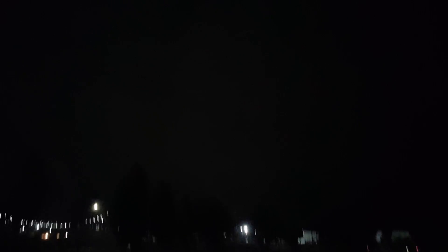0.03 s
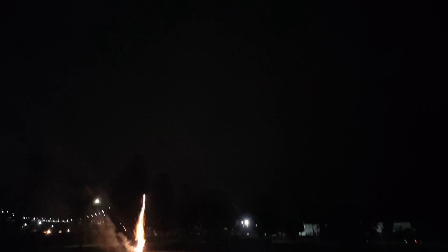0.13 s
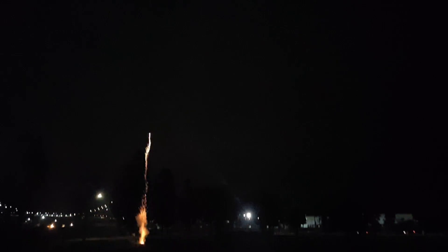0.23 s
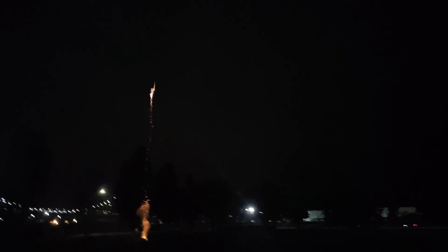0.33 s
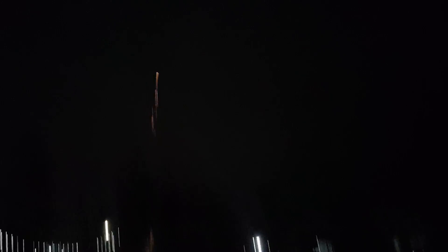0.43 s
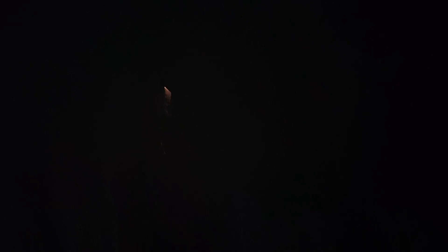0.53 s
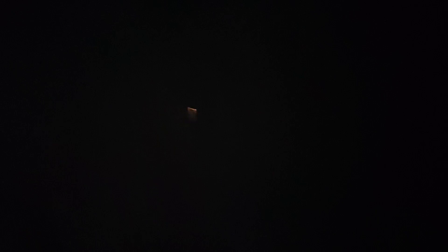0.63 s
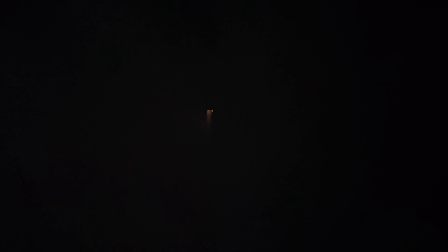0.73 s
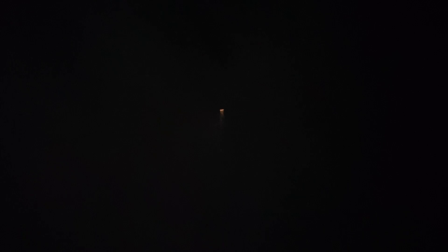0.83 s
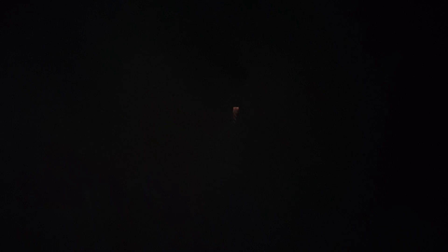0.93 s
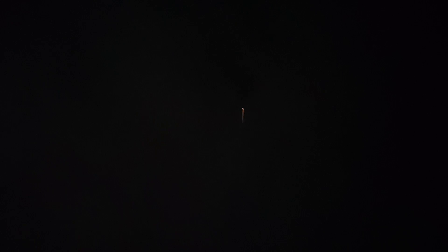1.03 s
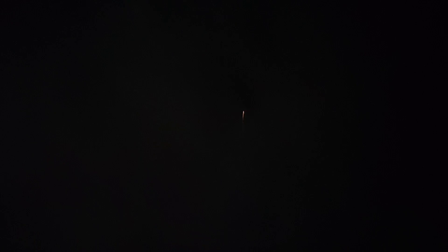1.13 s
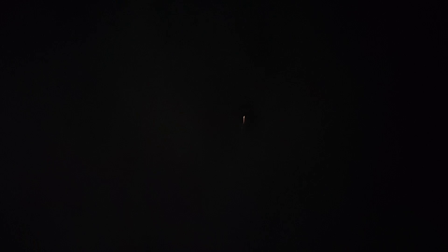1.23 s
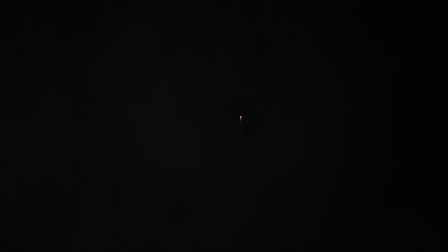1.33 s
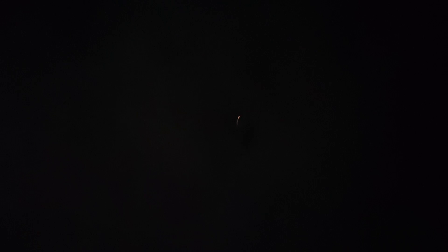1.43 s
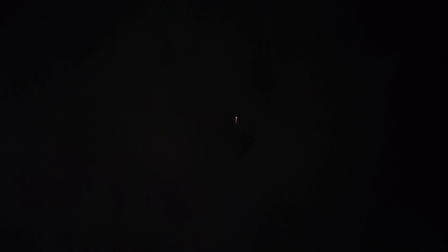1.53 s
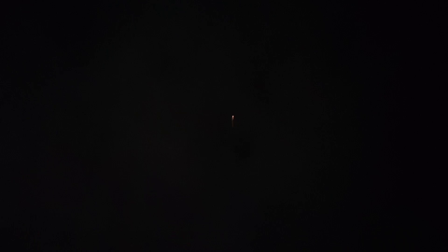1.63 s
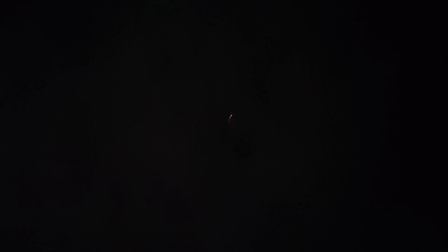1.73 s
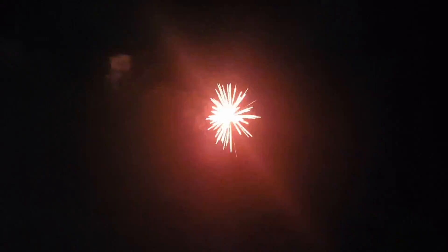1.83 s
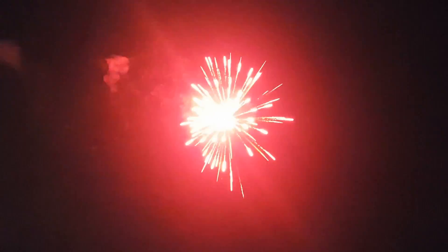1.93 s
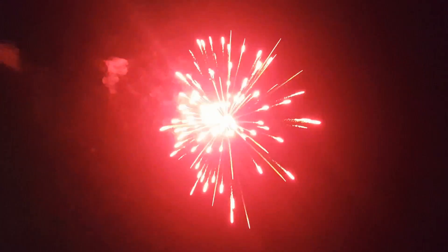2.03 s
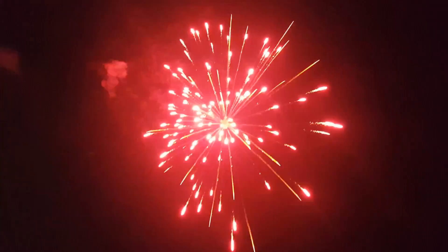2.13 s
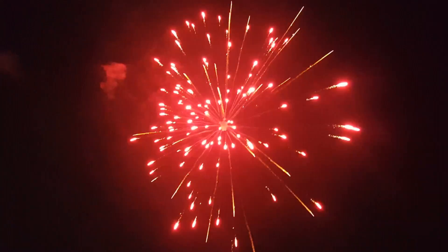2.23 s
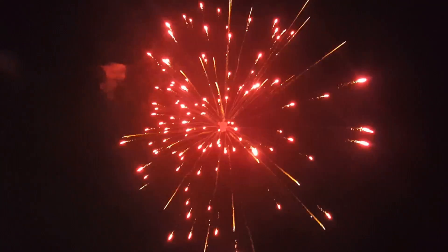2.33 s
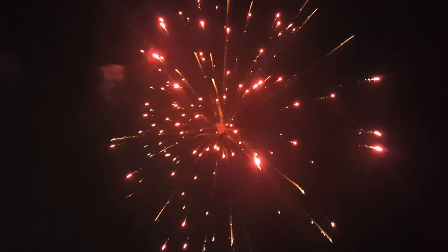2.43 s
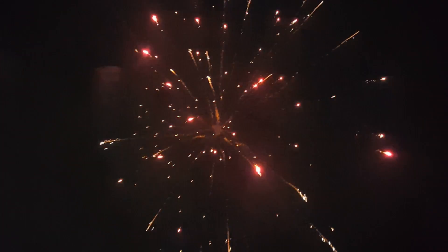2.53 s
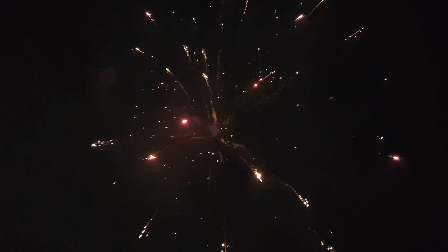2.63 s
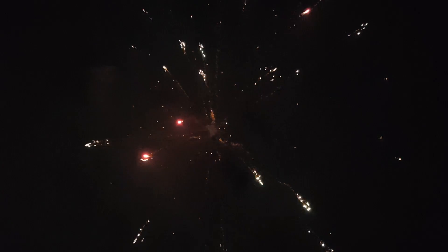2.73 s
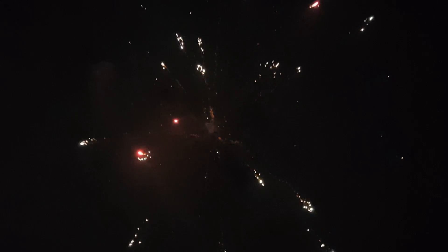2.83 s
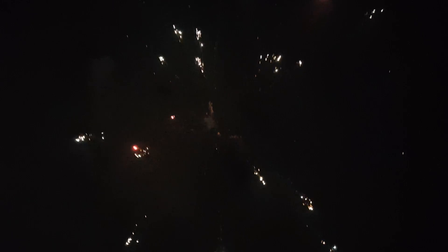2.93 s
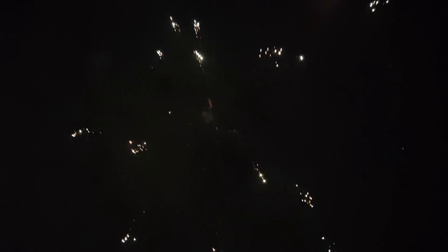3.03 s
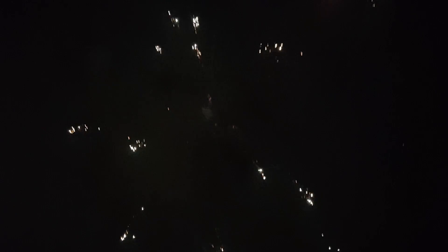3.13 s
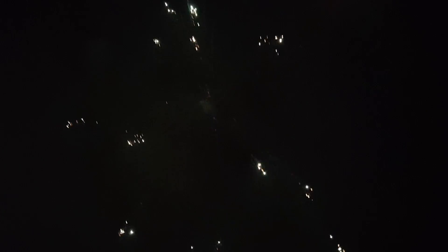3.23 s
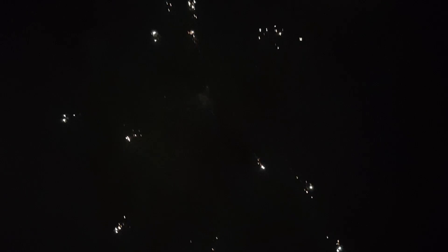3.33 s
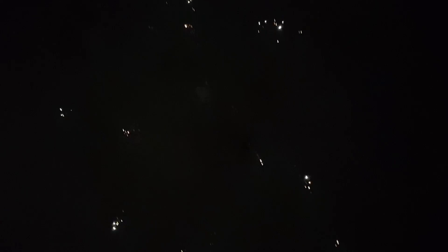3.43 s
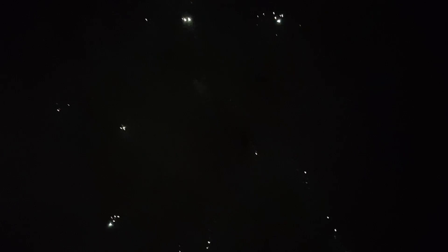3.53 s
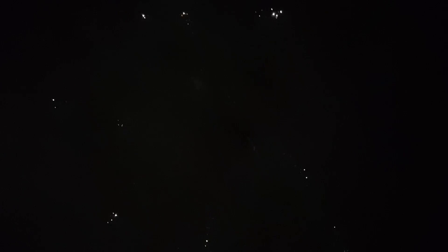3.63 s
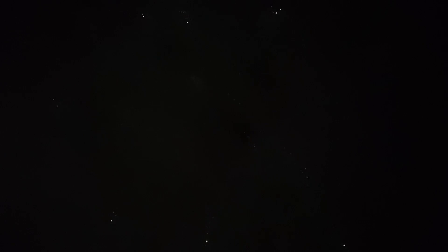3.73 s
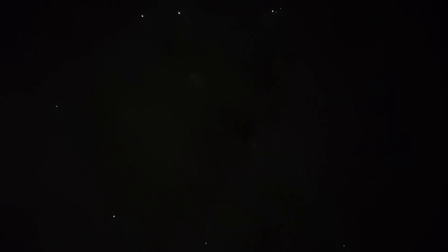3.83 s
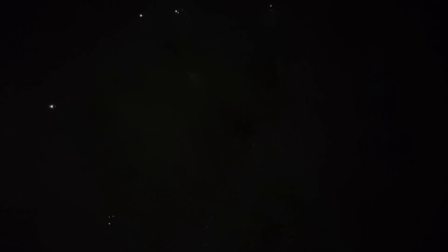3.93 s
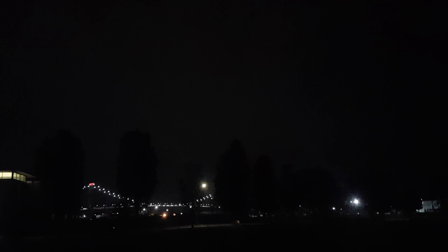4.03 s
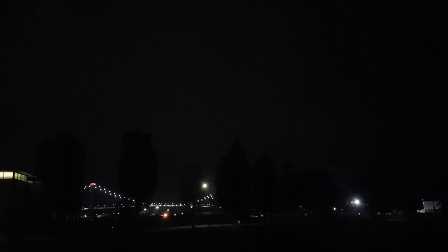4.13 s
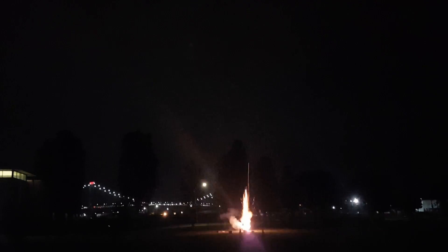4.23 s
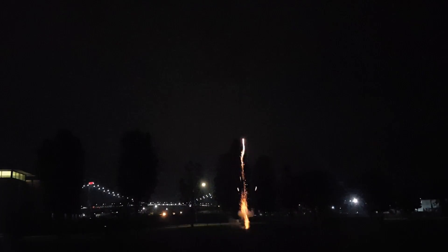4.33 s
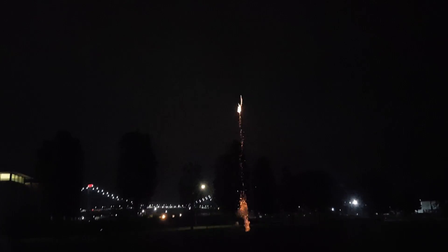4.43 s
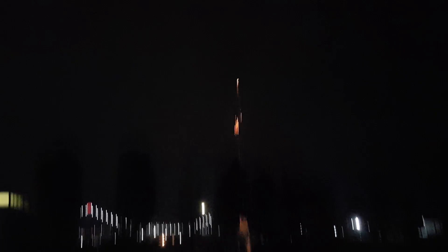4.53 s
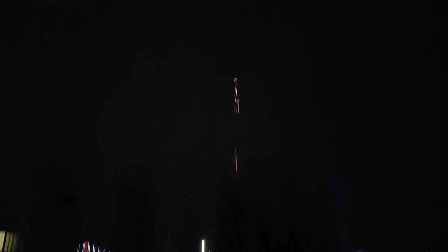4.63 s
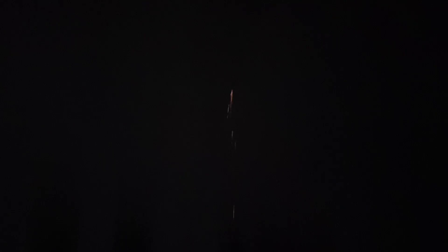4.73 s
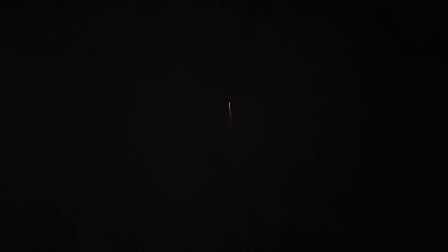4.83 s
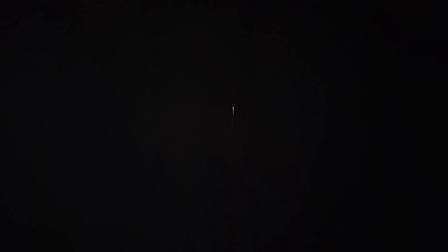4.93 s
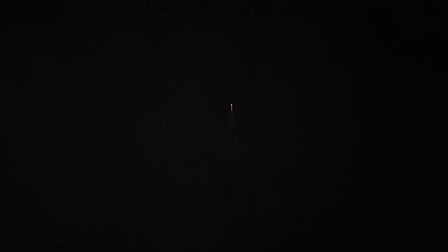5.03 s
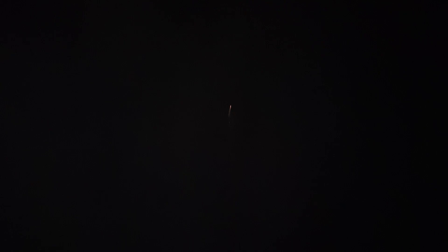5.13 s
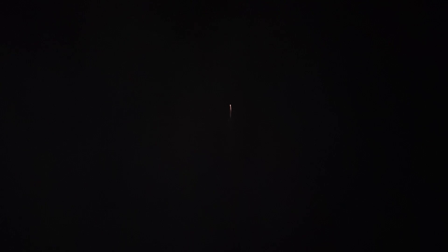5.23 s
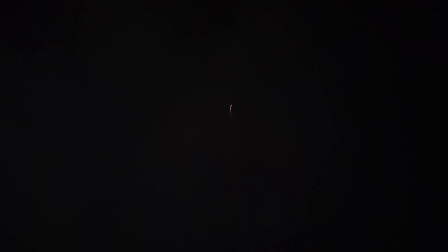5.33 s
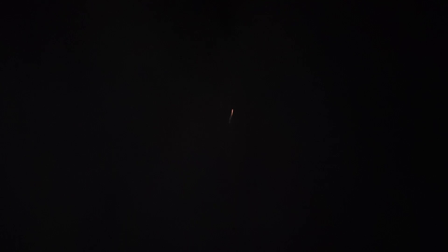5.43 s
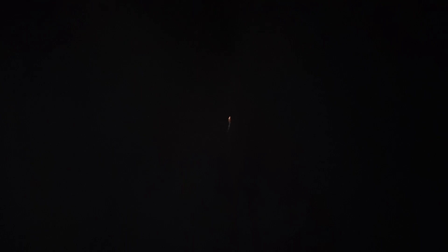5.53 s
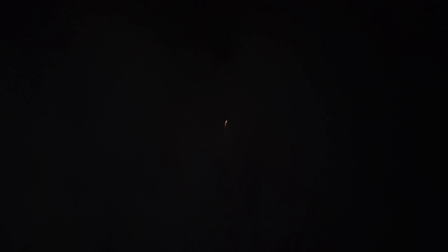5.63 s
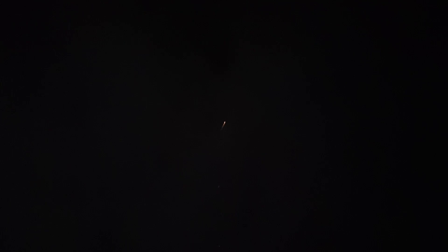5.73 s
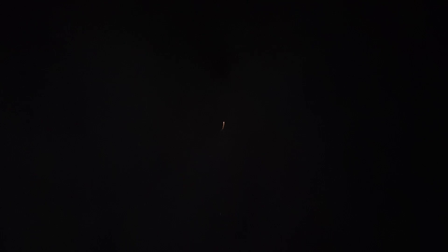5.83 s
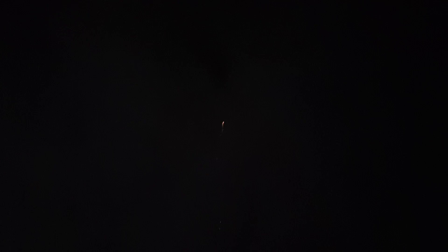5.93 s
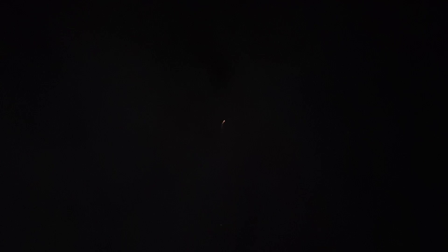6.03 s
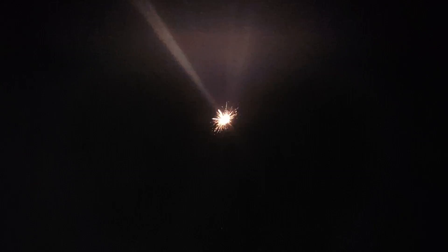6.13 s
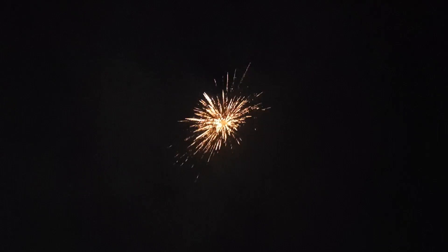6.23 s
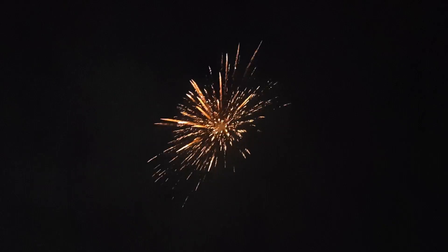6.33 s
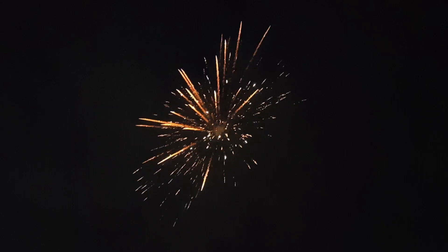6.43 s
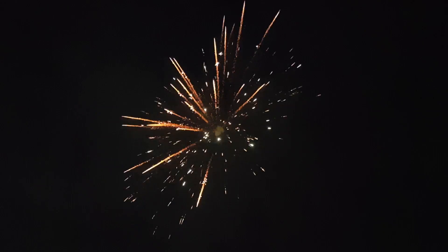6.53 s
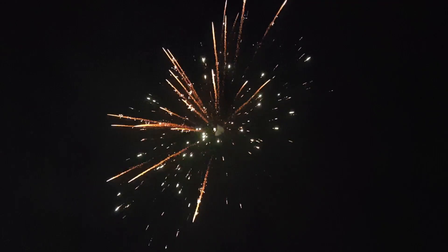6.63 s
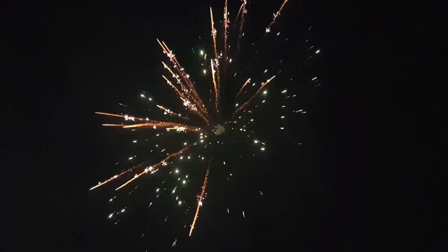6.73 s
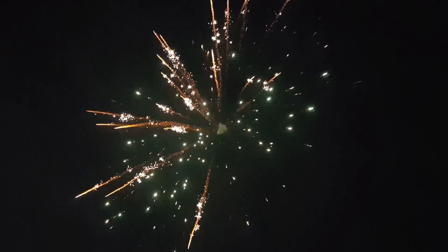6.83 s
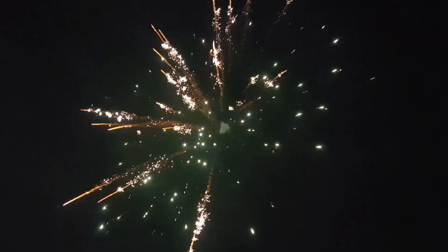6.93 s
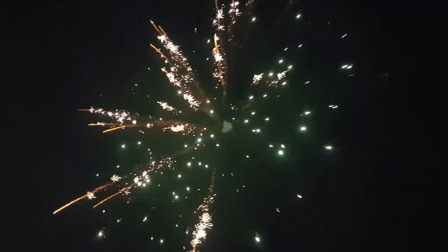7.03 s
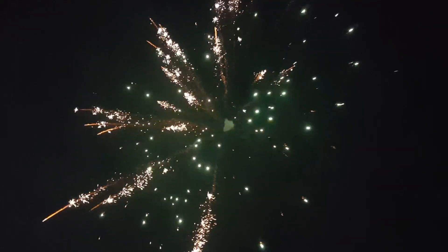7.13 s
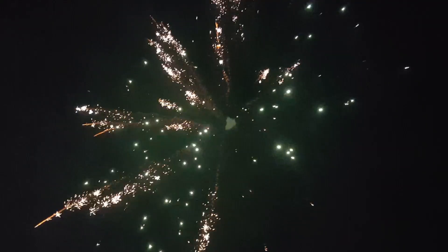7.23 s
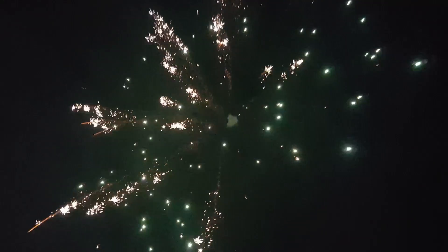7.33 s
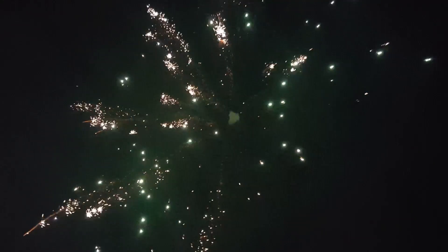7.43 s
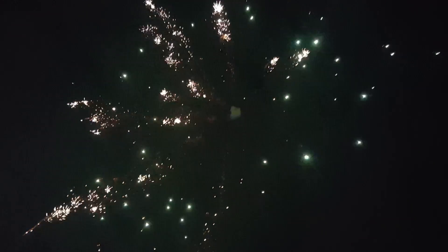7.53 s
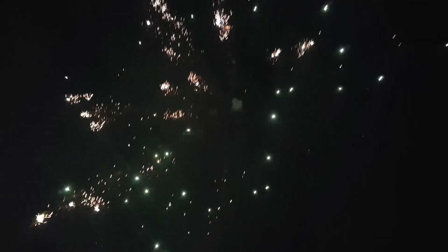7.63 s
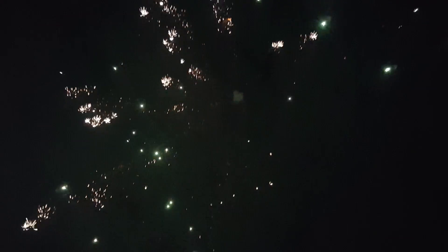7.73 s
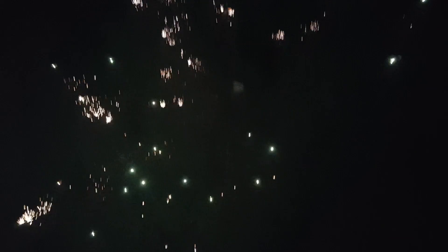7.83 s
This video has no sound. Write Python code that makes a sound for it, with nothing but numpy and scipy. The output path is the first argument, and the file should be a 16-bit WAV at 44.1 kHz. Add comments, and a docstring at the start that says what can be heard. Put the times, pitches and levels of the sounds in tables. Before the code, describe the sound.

At night, a mortar thud, then a cracking aerial boom with thunderlike roll; again a sharper launch, another boom, and fizzing, popping stars.

```python
"""Fireworks over a park at night

Two shells are fired from mortars with a gas jet, a thump and a ringing tube, and burst high overhead.
Decaying noise is the scatter off trees and near surfaces; delayed thumps and slaps are single echoes;
swelling noise is the far roll. The second shell's stars end in dense crackling: grainy noise and pops.
Blasts duck the microphone gain and overload it."""
import sys
import numpy as np
from scipy import signal
from scipy.fft import rfft, irfft, next_fast_len
from scipy.io import wavfile
from scipy.ndimage import uniform_filter1d, minimum_filter1d

SR = 44100
rng = np.random.default_rng(int(sys.argv[2]) if len(sys.argv) > 2 else 0)


def wrap_up_sound(samples):
    """Save the sound to the file named by the first command line argument, as 16-bit audio."""
    columns = np.atleast_2d(samples).T
    # keep every value between -1 and 1, then stretch to whole-number steps
    tamed = np.clip(columns, -1, 1)
    steps = np.round(tamed * 32767).astype(np.int16)
    wavfile.write(sys.argv[1], SR, steps)


N = 348390
TIME = np.arange(N) / SR

# Mortar shots. Each row: start in s, thump in dB, gas jet in dB, jet lead in s, jet top in Hz,
# muzzle crack in dB, tube ring in dB, tube pitch in Hz, close scatter in dB, tree scatter in dB, ignition in dB.
SHOTS = [(0.3252, 14, 5.5, .0105, 14000, 1.5, 3, 273.8, -16.5, -21, -45),
         (4.4385, 15.5, 9.5, .009, 6200, 16, 1, 286.5, -18.5, -22.5, -24)]
# Shell bursts. Each row: start in s, boom in dB, shock crack in dB, ground echo delay in s,
# ground echo in dB, near scatter in dB, long tail in dB.
SHELL_BURSTS = [(2.1189, 18.5, 16.5, .0088, -4, -1, -19.5), (6.4422, 18.5, 19.5, 0.00862, -3.5, 0, -18.5)]
# Spectrum of a crack. Each row: frequency in Hz, relative level in dB per Hz.
CRACK_SPECTRUM = [(150, 2.5), (700, 3.5), (1100, 3.5), (1900, 7), (3500, -1), (5500, -5.5), (8000, -4.5),
                  (10500, -19), (15000, -13)]
# Scatter off near surfaces. Each row: frequency in Hz, relative level in dB per Hz, t60 in s.
NEAR_SCATTER = [(39.4, -9, 0.18), (144, 4, 0.6), (295, 9.5, 0.34), (700, 14, 0.22), (1510, 3.5, 0.27),
                (4060, -0.5, .2), (8400, -4.5, 0.23), (10400, -15.5, 0.25), (14500, -6, 0.15)]


def amp(db):
    """Decibels to gain."""
    return 10 ** (np.asarray(db) / 20)


def rms_one(x):
    """Scale to an rms of 1."""
    return x / np.sqrt(np.mean(x ** 2) + 1e-20)


def at_hz(table, hz, axis=1):
    """Read a column of a table along a log-frequency axis."""
    table = np.array(table)
    return np.interp(np.log(np.maximum(hz, 1)), np.log(table[:, 0]), table[:, axis])


def level(curve):
    """Gain along a dB curve, fading to silence just outside it."""
    s, db = np.transpose(curve)
    outside_s = np.abs(TIME - np.clip(TIME, s[0], s[-1]))
    return amp(np.interp(TIME, s, db)) * np.exp(-outside_s / 0.056)


def add(out, s, sound):
    """Mix a sound in from time s on."""
    i = int(round(s * SR))
    out[:, i:i + sound.shape[-1]] += sound[..., :max(N - i, 0)]


def cut(x, hz, kind, order=2):
    """A Butterworth low-pass or high-pass."""
    return signal.sosfilt(signal.butter(order, hz, kind, fs=SR, output="sos"), x)


def noise(spectrum, size, grain_db=0):
    """Stereo noise of rms 1; grain makes some of the countless tiny arrivals stand out."""
    # Stereo likeness. Each row: frequency in Hz, left-right correlation from 0 to 1.
    likeness = [(100, .98), (250, 0.91), (500, 0.43), (1000, 0), (2000, 0.11), (5000, 0), (15000, 0.34)]
    n = next_fast_len(size)
    hz = np.fft.rfftfreq(n, 1 / SR)
    grain = amp(grain_db * np.minimum(rng.exponential(1, n), 6))
    arrivals = rng.standard_normal((2, n)) * grain
    mid, side = rfft(arrivals) * amp(at_hz(spectrum, hz)) * (hz > 12)
    alike = np.clip(at_hz(likeness, hz), -1, 1)
    stereo = np.sqrt(1 + alike) * mid + np.sqrt(1 - alike) * side * [[1], [-1]]
    return rms_one(irfft(stereo, n)[:, :size])


def flutter(size, rate_hz, depth_db):
    """A random gain that takes a new value rate_hz times a second, with straight dB ramps between."""
    knots = np.arange(size) / SR * rate_hz
    return amp(depth_db * np.interp(knots, np.arange(4000), rng.standard_normal(4000)))


def dying(x, t60_at, patchy_db):
    """Every frequency of x has its own decay time; interfering paths leave passing patches of colour."""
    hz, age, cells = signal.stft(x, SR, nperseg=512)
    patches = uniform_filter1d(rng.standard_normal(cells.shape[1:]), size=3, axis=0)
    patches = rms_one(uniform_filter1d(patches, size=5, axis=1))
    decay = np.exp(-np.log(1000) * age / t60_at(hz)[:, None])
    return signal.istft(cells * decay * amp(patchy_db * patches), SR)[1][:, :x.shape[-1]]


def scatter(table, delay_s, rise_s, grain_db, patchy_db):
    """A cloud of small echoes that sets in after a delay and dies band by band."""
    age = TIME[:2 * SR]
    cloud = dying(noise(table, len(age), grain_db), lambda hz: at_hz(table, hz, axis=2), patchy_db)
    onset = np.clip((age - delay_s) / rise_s, 0, 1)
    fade = np.minimum((age[-1] - age) / 0.27, 1)
    return cloud * onset * fade * flutter(len(age), 69.64, 0.9)


def thump(push_s, low_hz, high_hz, order=4):
    """A blast wave: a sudden push that swings on a few times once most of its deep bass is lost; peak 1."""
    push = np.exp(-TIME[:SR // 4] / push_s)
    wave = cut(push, low_hz, "high", order=order) + amp(-26.0) * cut(push, 23.7, "high")
    wave = cut(wave, high_hz, "low")
    return -wave / np.abs(wave).max()


def puff(spectrum, decay_s):
    """A sharp burst of noise with exponential decay."""
    age = TIME[:SR // 4]
    return noise(spectrum, len(age)) * np.exp(-age / decay_s)


def night():
    """Distant town and microphone hiss: steady coloured noise."""
    # Each row: frequency in Hz, relative level in dB per Hz.
    night_spectrum = [(25, -32), (60, 1), (100, 4.5), (135, 2), (220, -2), (350, -15), (550, -15.5),
                      (1000, -16.5), (1600, -17), (2500, -23.5), (4000, -39.5), (7000, -48.5), (10000, -56),
                      (15000, -51.5)]
    return amp(-38.5) * noise(night_spectrum, N)


def hum():
    """A faint low hum at the start: one sine with a wavering level."""
    # Each row: time in s, level in dB.
    hum_curve = [(0, -36.5), (.3, -39.5), (1.0, -40.5)]
    hum_hz = 97.4
    return level(hum_curve) * np.sin(2 * np.pi * hum_hz * TIME) * flutter(N, 12, 2)


def launches():
    """Gas jets past the shell, the tube cracks and thumps as the shell leaves and rings on; trees answer."""
    # Gas jet spectrum. Each row: frequency in Hz, relative level in dB per Hz.
    jet_spectrum = [(150, 2.5), (600, 6.5), (1000, -1), (1800, 5), (3500, 0), (5500, -7.5), (8000, -4),
                    (10500, -13), (15000, -9.5)]
    # Tree scatter. Each row: frequency in Hz, relative level in dB per Hz, t60 in s.
    tree_scatter = [(40, -10.5, 1.8), (112.4, 19, 2.5), (248, 18, 2.4), (467, 4.5, 0.32), (940, -14, 2.7),
                    (1910, 2, 3.6), (3950, -3, 2.28), (8750, -11, 1.35), (9800, -16.5, 0.45),
                    (15000, -17.5, 0.89)]
    ignition_lead_s = .0075   # the lifting charge catches with a small spit just before the gas jets out
    out, age = np.zeros((2, N)), TIME[:SR // 4]
    for (s, thump_db, jet_db, lead_s, top_hz, crack_db, ring_db, tube_hz,
         close_db, trees_db, ignition_db) in SHOTS:
        spit = cut(puff(jet_spectrum, .002), 5000, "low")
        add(out, s - lead_s - ignition_lead_s, amp(ignition_db) * spit)
        jet_shape = np.minimum(age / lead_s, 1) ** 2.58 * np.exp(-np.maximum(age - lead_s, 0) / 0.0035)
        jet = amp(jet_db) * noise(jet_spectrum, len(age), grain_db=3.5) * jet_shape
        add(out, s - lead_s - .001, cut(jet, top_hz, "low", order=1))
        add(out, s, amp(crack_db) * cut(puff(CRACK_SPECTRUM, 0.002), top_hz, "low"))
        add(out, s, amp(thump_db) * thump(0.0087, 108, 200, order=3) * amp([[.6], [-.6]]))
        tube = np.sin(2 * np.pi * tube_hz * age) - amp(-7.0) * np.sin(2 * np.pi * 300 * age)
        add(out, s + .008, amp(ring_db) * tube * np.exp(-age / .018))
        add(out, s, amp(close_db) * scatter(NEAR_SCATTER, 0, 0.0055, grain_db=2, patchy_db=1.0))
        add(out, s, amp(trees_db) * scatter(tree_scatter, 0.018, .05, grain_db=4, patchy_db=3.5))
    return out


def echoes():
    """Large surfaces return each blast as a dull thump and a smeared slap, each coloured, duller from afar."""
    # Slap spectrum. Each row: frequency in Hz, relative level in dB per Hz.
    slap_spectrum = [(200, -14), (600, 3.5), (1200, 6.5), (1900, 6), (3000, 3.5), (5000, -1.5), (8000, -3),
                     (10500, -17), (16000, -26)]
    # Buildings and tree lines answering every mortar shot.
    # Each row: delay in s, thump in dB, slap in dB, slap centre in Hz, smear in s.
    mortar_surfaces = [(.064, -22, -16.5, 3400, .004), (0.08, -19, -16.5, 2300, .005),
                       (.087, -36, -19.5, 4470, .02), (.095, -15, -14, 1600, 0.0046),
                       (.113, -15, -14.5, 2130, .0045), (.138, -11.5, -17.5, 1250, 0.0064),
                       (.183, -38, -18.5, 2000, 0.0057), (0.226, -31, -23.5, 1700, 0.0047),
                       (0.28, -17.5, -27.5, 3000, 0.021), (.762, -25, -36, 2300, .006),
                       (0.8854, -22, -29.5, 1830, 0.0017), (1.785, -26.5, -36.5, 1000, .005)]
    # Surfaces answering every burst in the sky.
    # Each row: delay in s, thump in dB, slap in dB, slap centre in Hz, smear in s.
    sky_surfaces = [(.14, -10, -14, 2700, 0.0044), (0.272, -22.5, -24.5, 750, .011),
                    (.364, -11, -29, 601.6, .009), (.842, -15.5, -29, 1090, .004),
                    (1.512, -33, -27.5, 1410, 0.0097), (1.694, -10, -22.5, 900, 0.0082)]
    out, dull = np.zeros((2, N)), thump(0.0012, 148, 164)
    age, hz = TIME[:SR // 4], np.geomspace(100, SR / 2, 50)
    for blasts, surfaces in (SHOTS, mortar_surfaces), (SHELL_BURSTS, sky_surfaces):
        for travel_s, thump_db, slap_db, centre_hz, smear_s in surfaces:
            hump_db = 9 * np.exp(-(np.log2(hz / centre_hz) / 0.52) ** 2)
            air_loss_db = 6 * travel_s * (hz / 4500) ** 2.3
            colour = np.column_stack([hz, at_hz(slap_spectrum, hz) + hump_db - air_loss_db])
            smear = np.sqrt(age / smear_s) * np.exp(.5 - age / smear_s)
            for s, *_ in blasts:
                slap = noise(colour, len(age)) * smear
                add(out, s + travel_s, amp(thump_db) * dull + amp(slap_db) * slap)
    return out


def swell(age, delay_s, attack_s, hold_until_s, fall_db_per_s, last_s, release_s=0.045):
    """Gain of a roll: it sets in, holds, sinks with distance and dies after the last echo."""
    attack = np.clip((age - delay_s) / attack_s, 0, 1)
    fall = amp(-fall_db_per_s * np.maximum(age - hold_until_s, 0))
    return attack * fall * np.exp(-np.maximum(age - last_s, 0) / release_s)


def rolls():
    """Far echoes merge like thunder; the later they come, the more treble the air has taken."""
    # Rumble spectrum. Each row: frequency in Hz, relative level in dB per Hz.
    rumble_spectrum = [(25, -27), (50, -25), (85, -1), (150, 7), (250, 0.5), (330, -11), (480, -42),
                       (900, -58.5)]
    # Roar spectrum. Each row: frequency in Hz, relative level in dB per Hz.
    roar_spectrum = [(200, -8), (480, -19), (720, -3), (1200, -5), (2000, 0.5), (3000, -4), (4500, -6),
                     (8000, -14), (10000, -27), (15000, -24)]
    # Roll after each mortar shot. Each row: rumble in dB, roar in dB.
    mortar_rolls = [(-33.5, -39.5), (-35, -40.5)]
    # Roll after each burst. Each row: rumble in dB, roar in dB.
    sky_rolls = [(-28.5, -27.5), (-25, -26.5)]
    # Swell shapes: delay in s, attack in s, hold until in s, fall in dB per s, last echo in s.
    mortar_rumble, mortar_roar = (0.623, 0.076, 0.85, 20.6, 2.0), (0.66, 0.036, 1, 7.1, 2.5)
    sky_rumble, sky_roar = (0.045, 0.38, 1.19, 18.6, 2.0), (0.042, 0.088, 1.12, 7, 1.92)
    out, age = np.zeros((2, N)), TIME[:3 * SR]
    kinds = ((SHOTS, mortar_rolls, mortar_rumble, mortar_roar),
             (SHELL_BURSTS, sky_rolls, sky_rumble, sky_roar))
    for blasts, strengths, rumble_shape, roar_shape in kinds:
        for (s, *_), (rumble_db, roar_db) in zip(blasts, strengths):
            lumps = flutter(len(age), 55, 1.6)
            grains = flutter(len(age), 450, 1.8)
            rumble = noise(rumble_spectrum, len(age)) * lumps
            cloud = noise(roar_spectrum, len(age), grain_db=2.5) * grains
            roar = dying(cloud, lambda hz: 4.13 * (4500 / (hz + 1)) ** 1.07, patchy_db=1.5)
            roar = roar * np.sqrt(lumps)
            add(out, s, amp(rumble_db) * rumble * swell(age, *rumble_shape))
            add(out, s, amp(roar_db) * roar * swell(age, *roar_shape))
    return out


def shock(crack_db):
    """The steep front of a blast: a spike reaching the two ports a moment apart, and a short ragged edge."""
    age = TIME[:SR // 4] - np.array([[0], [.00007]])
    spike = (age >= 0) * np.exp(-np.abs(age) / 0.00019)
    return amp(crack_db) * (amp(-3.0) * spike + puff(CRACK_SPECTRUM, 0.0018))


def bursts():
    """A shock from the sky, its twin off the ground, then scatter from near and far."""
    # Long tail. Each row: frequency in Hz, relative level in dB per Hz, t60 in s.
    tail_scatter = [(40, -103, 1.2), (113, 6.5, 3.8), (252, 19.5, 6.7), (511, 2, 5.2), (674, 8, 7.1),
                    (1080, -1.5, 7.3), (2200, 4, 2.64), (4600, -4, 0.72), (8500, -10.5, 2.28),
                    (9500, -14.5, 0.97), (14900, -8.5, 0.49)]
    out = np.zeros((2, N))
    for s, boom_db, crack_db, ground_s, ground_db, near_db, tail_db in SHELL_BURSTS:
        boom = amp(boom_db) * thump(0.0078, 132, 210, order=3)
        rasp = amp(crack_db - 24) * puff(CRACK_SPECTRUM, 0.017)   # the shock frays on the rough ground
        add(out, s, boom + rasp + shock(crack_db))
        add(out, s + ground_s, amp(ground_db) * (boom + shock(crack_db - 6.0)))
        add(out, s, amp(near_db) * scatter(NEAR_SCATTER, 0.0017, 0.013, grain_db=4, patchy_db=1.5))
        add(out, s, amp(tail_db) * scatter(tail_scatter, 0.015, 0.082, grain_db=2.5, patchy_db=2.5))
    return out


def tick():
    """A faint dry tick: a step that decays within a few samples."""
    out = np.zeros((2, N))
    add(out, 4.043, amp(-28) * np.exp(-TIME[:SR // 100] / .00006))
    return out


def crackle():
    """Stars catch one after another: grainy noise fizzes, coarser clicks pop, a few snaps stand out."""
    # Star spectrum. Each row: frequency in Hz, relative level in dB per Hz.
    star_spectrum = [(500, 0), (1800, 4.5), (3500, 0), (5500, -1.5), (8400, -0.5), (10000, -12.5),
                     (13500, -11), (16000, -25)]
    # The loudest single stars. Each row: start in s, level in dB.
    snaps = [(7.3183, -29), (7.3986, -34), (7.428, -40), (7.4814, -27), (7.5293, -39), (7.6113, -19),
             (7.714, -23), (7.7668, -29), (7.808, -31)]
    start_s, rise_s, rise_db, full_db = 7.03, 0.27, 11.5, -39.5
    pops_per_s, clusters_per_s, cluster_db = 170, 38, 2
    fizz = noise(star_spectrum, N, grain_db=3.5) * flutter(N, 260, 2.7)
    clicks = (rng.random(N) < pops_per_s / SR) * rng.standard_normal((2, N))
    pops = rms_one(cut(cut(clicks, 1100, "high"), 7300, "low", order=4))
    rise = np.minimum((TIME - start_s) / rise_s, 1)   # negative before start_s: same dB slope from silence
    burning = amp(full_db - rise_db * (1 - rise)) * flutter(N, clusters_per_s, cluster_db)
    out = (fizz + amp(-7) * pops) * burning
    for s, db in snaps:
        add(out, s, amp(db) * puff(star_spectrum, 0.00085))
    return out


def scene():
    """Shots, bursts and their echoes over the quiet of the park, the left channel slightly louder."""
    out = night() + hum() + launches() + echoes() + rolls() + bursts() + tick() + crackle()
    return out * amp([[.35], [-.35]])


def gain_control(x, threshold_db=-3, most_db=12, hold_s=0.55, release_db_per_s=42):
    """A blast pulls the gain down at once; it is held there, then creeps back."""
    peak_db = 20 * np.log10(np.abs(x).max(axis=0) + 1e-9)
    over_db = np.clip(peak_db - threshold_db, 0, most_db)
    half = int(hold_s * SR / 2)
    # the origin shift makes the window look back only
    held_db = -minimum_filter1d(-over_db, 2 * half + 1, origin=half, mode="constant")
    ramp_db = release_db_per_s * TIME
    duck_db = np.maximum.accumulate(held_db + ramp_db) - ramp_db
    return x * amp(-cut(duck_db, 250, "low", order=1))


def record(dry):
    """Gain control, overload that flattens the blasts, and a steep top cut."""
    cutoff_hz = 15300
    clipped = np.tanh(gain_control(dry))
    size = 2 * next_fast_len(N)
    hz = np.fft.rfftfreq(size, 1 / SR)
    top_cut = 1 / np.sqrt(1 + (hz / cutoff_hz) ** 80)
    return irfft(rfft(clipped, size) * top_cut)[:, :N]


dry = scene()
out = record(dry)
wrap_up_sound(out)
```